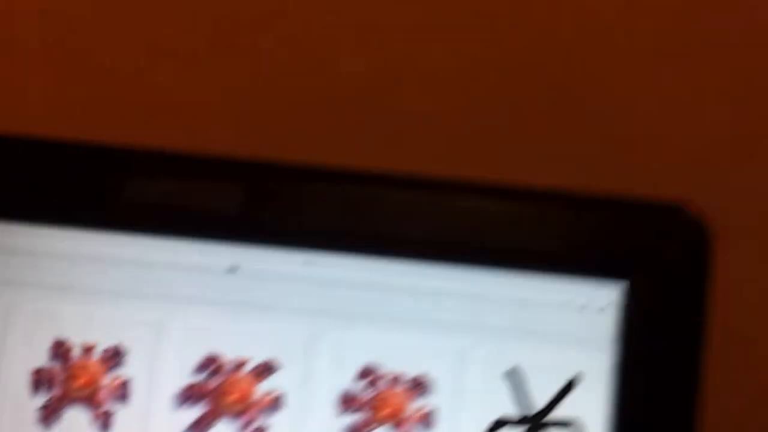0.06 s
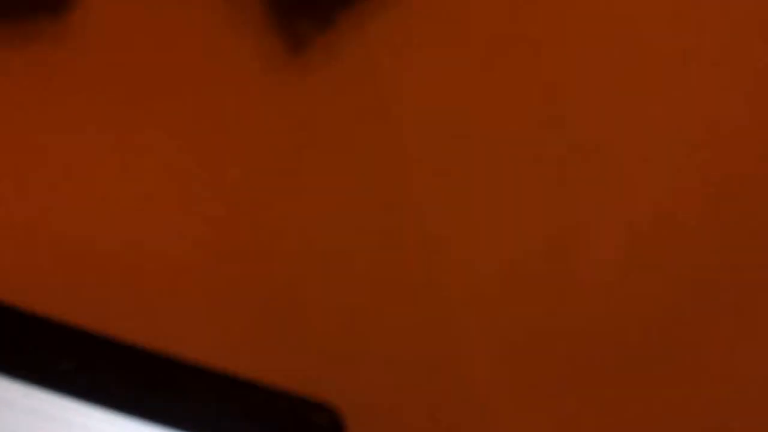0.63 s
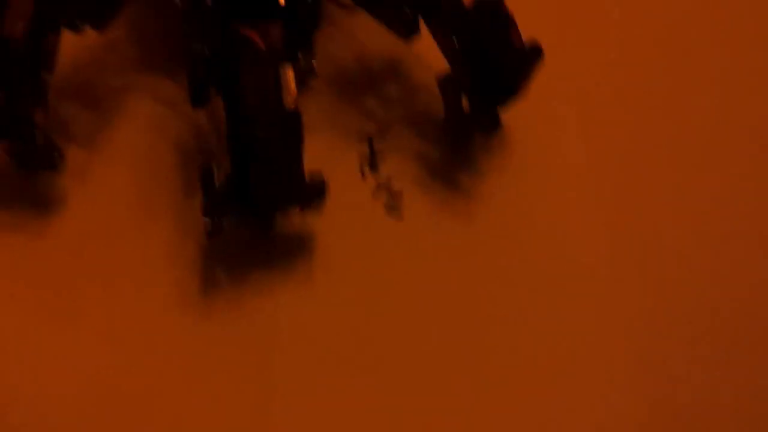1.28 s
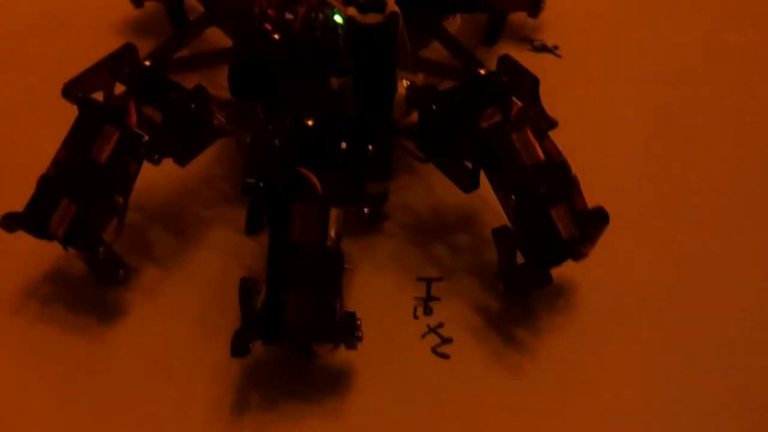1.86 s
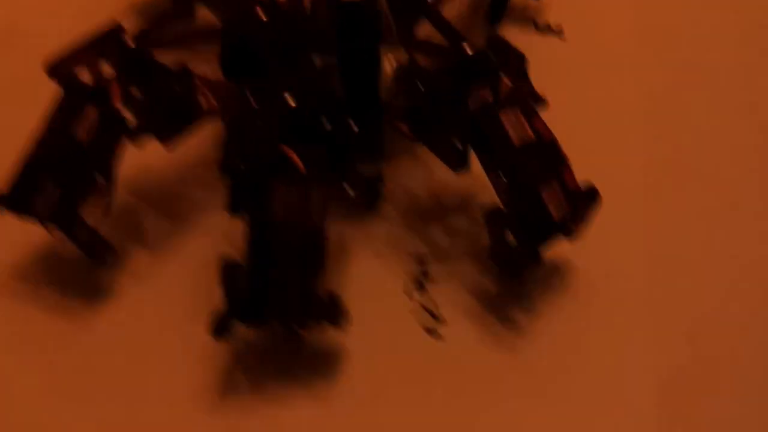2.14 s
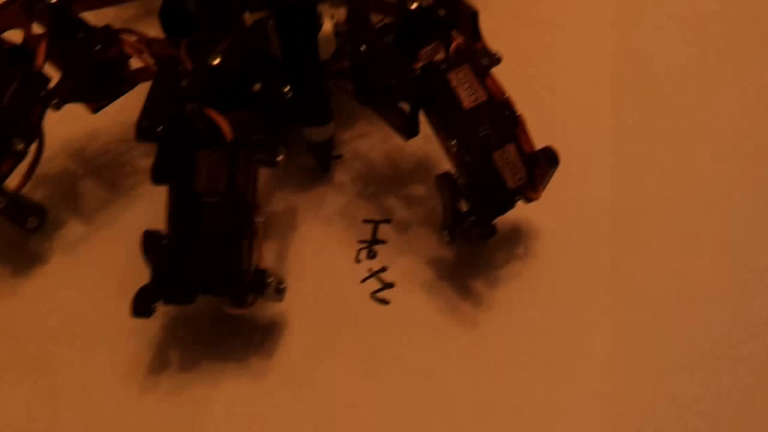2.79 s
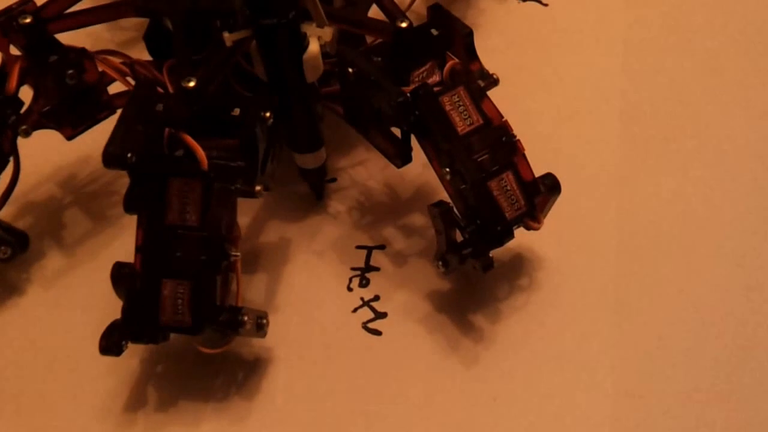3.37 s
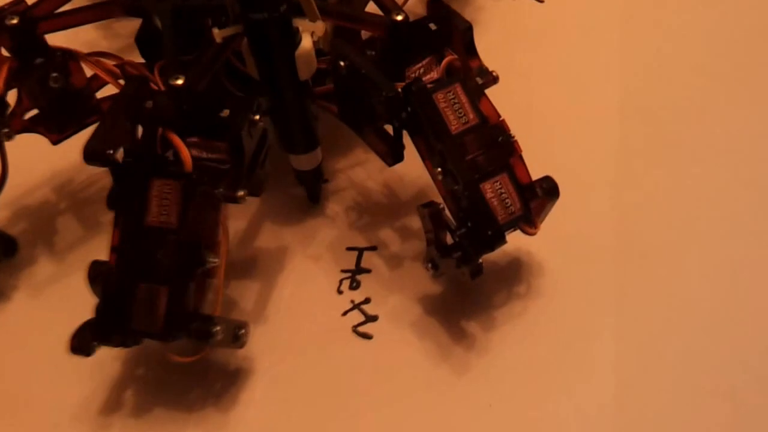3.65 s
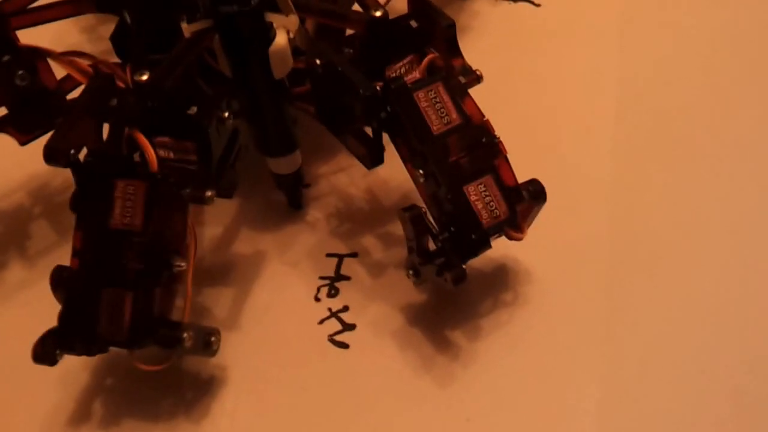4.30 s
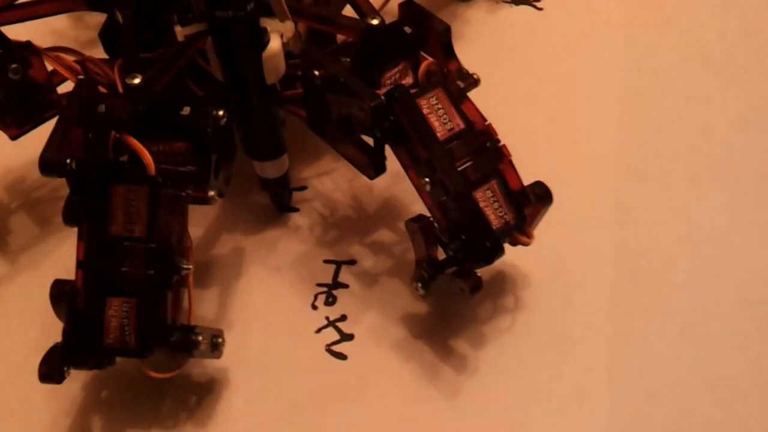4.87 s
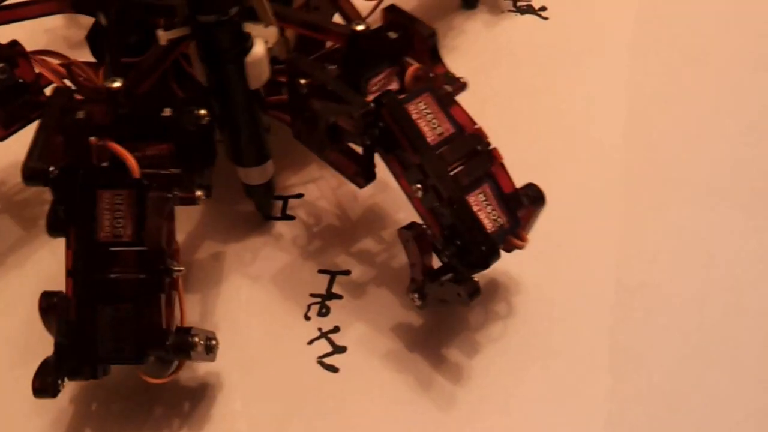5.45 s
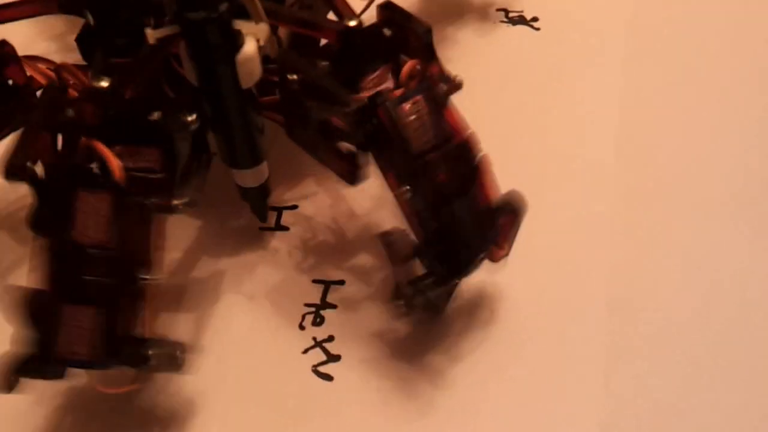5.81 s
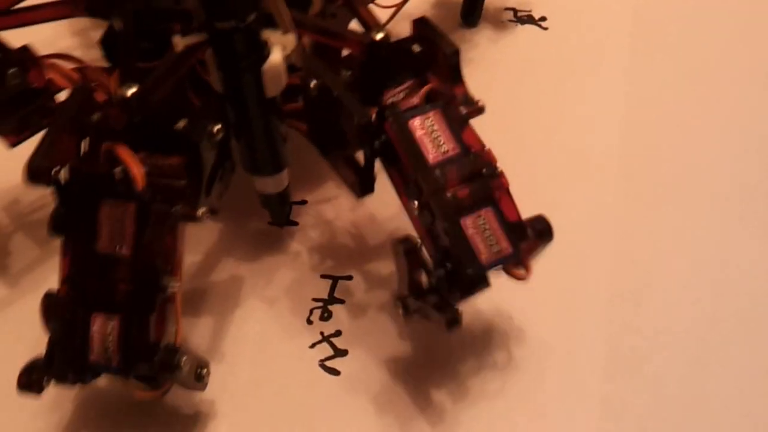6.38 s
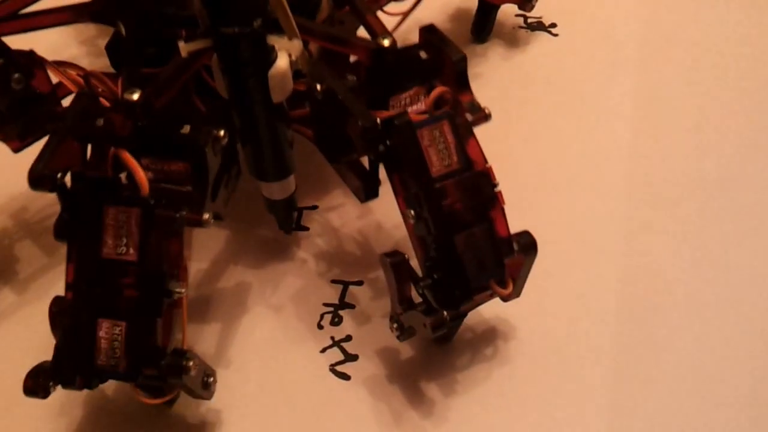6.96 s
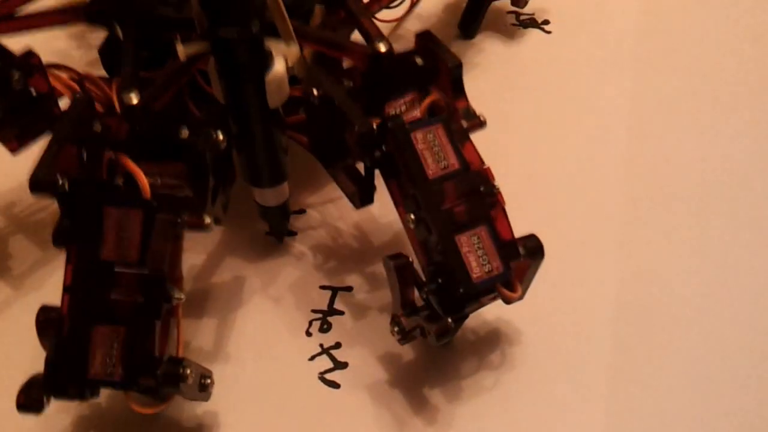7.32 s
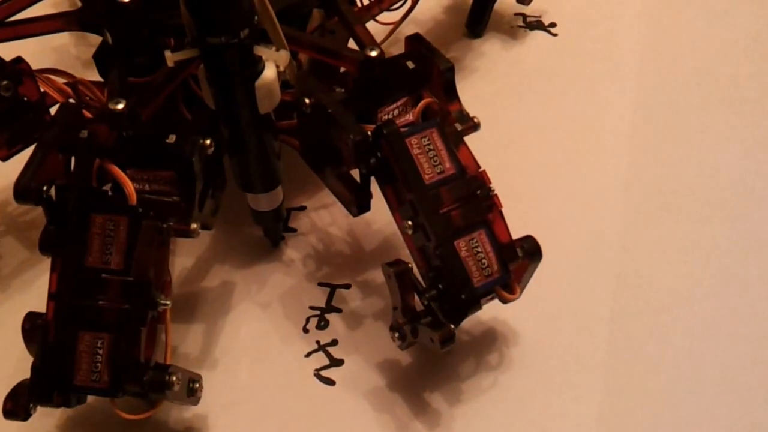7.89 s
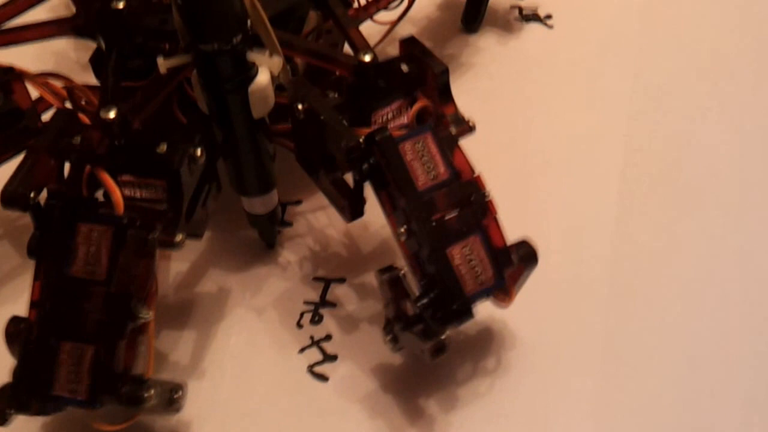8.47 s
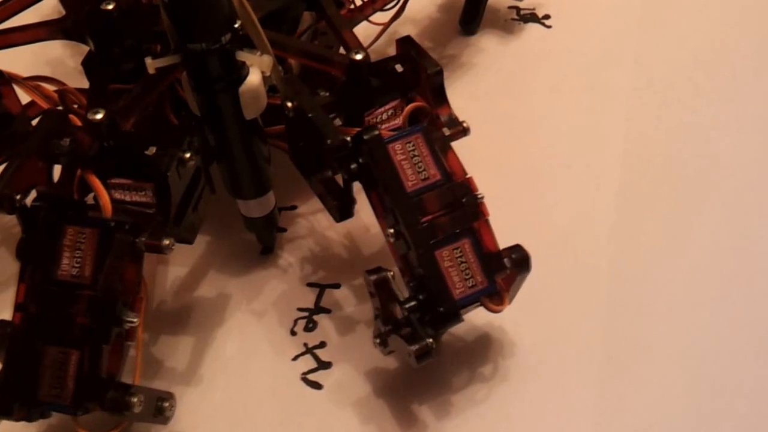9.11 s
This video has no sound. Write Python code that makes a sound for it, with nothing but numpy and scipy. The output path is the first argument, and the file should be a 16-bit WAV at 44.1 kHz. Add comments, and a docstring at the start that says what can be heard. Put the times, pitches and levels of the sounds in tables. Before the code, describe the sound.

Small servo motors in a legged robot chatter with a fine, steady buzz and scattered ticks, at first beside the fading hiss of a laptop fan. Later comes a run of short, bright whirs, mixed with knocks of feet and a pen on a tabletop, before the motors settle back to buzzing. A hand-held microphone picks it up nearby, over faint room hiss.

```python
"""A laptop fan hisses, then fades as a hand-held camera swings to a six-legged robot drawing with a pen.
Its servos chatter at the 50 Hz control rate while they hold the pose, then whir through six short moves:
the impacts of gear teeth excite the gearbox resonances. Motor brushes spit; a few sharp clicks stand out.
Legs and pen knock on the table, which rings in damped modes; the small room hisses faintly."""
import sys
import numpy as np
from scipy import signal
from scipy.fft import rfft, irfft, next_fast_len
from scipy.io import wavfile
from scipy.ndimage import uniform_filter1d, map_coordinates

SR = 44100
rng = np.random.default_rng(int(sys.argv[2]) if len(sys.argv) > 2 else 0)


def put_to_file(sound):
    """Save the sound as 16-bit audio at rate SR, in the file named by the first command-line argument."""
    columns = np.atleast_2d(sound).T  # one column per channel
    safe = np.clip(columns, -1, 1)
    whole_steps = np.round(safe * 32767)
    wavfile.write(sys.argv[1], SR, whole_steps.astype(np.int16))


N = 403074
FRAME_HZ, SPIN_UP_S = 50, 0.018  # control rate; time a motor takes to reach speed

# chatter of the servos holding the pose [t/s, level/dB, brightness/dB]
HOLD = [(0, -52.5, -15), (1.1, -51.5, -11.5), (1.5, -50.5, -12), (2.5, -49.5, -14), (2.85, -52, -12.5),
        (3.3, -48, -13), (5.4, -48, -10.5), (7.6, -51.5, -16), (8.35, -47.5, -10.5), (8.65, -50, -15),
        (9.14, -50.5, -14)]
# each servo's turn within the control frame [t/s, level/dB]
SERVO_SLOTS = [(.0095, 1), (.0135, -4.5), (0.014, -1), (0.018, 3.5)]
# spectrum of a running gearbox [f/Hz, level/dB]
GEAR_SPECTRUM = [(600, -45), (1600, -36), (2300, -31), (3100, -27), (4300, -16.5), (5300, -5), (6050, 1),
                 (6700, -2.5), (7600, -4.5), (9400, -9), (12700, -10.5), (15400, -16.5)]
# main impacts on the table [t/s, peak level/dB, hardness/dB]
KNOCKS = [(.123, -30.5, -12.5), (.755, -44, -11), (2.065, -33, -28), (4.233, -32.5, -19), (5.625, -32, -12),
          (5.652, -19, -18.5), (5.732, -33, -15), (6.045, -36, -8), (6.081, -34.5, -2), (6.108, -32, -15),
          (6.555, -22.5, -10), (6.601, -26.5, -6.5), (6.651, -35.5, -33), (6.854, -30.5, -9),
          (6.907, -34, -6), (6.922, -28, -29), (7.003, -32.5, -11), (7.072, -32, -16), (7.281, -21, -11.5),
          (7.295, -18.5, -14), (7.359, -23.5, -23), (7.39, -27, -11), (7.41, -27.5, -18),
          (8.893, -35.5, -14), (8.914, -33, -17.5), (9.044, -32, -30)]


def amp(db):
    """Amplitude ratio of a level in decibels."""
    return 10 ** (np.asarray(db) / 20)


def unit(x):
    """Normalisation to rms 1."""
    return x / np.sqrt(np.mean(x ** 2) + 1e-20)


def along(points, hz):
    """Interpolation of [f/Hz, value] points on a logarithmic frequency axis."""
    f, values = np.transpose(points)
    return np.interp(np.log(hz + 1), np.log(f), values)


def curves(rows):
    """Linear interpolation, sample by sample, of each column after t/s."""
    times, *columns = np.transpose(rows)
    return [np.interp(np.arange(N) / SR, times, column) for column in columns]


def wobble(rate):
    """Smooth random modulation: a spline through `rate` knots a second."""
    knots = rng.standard_normal(int(N * rate / SR) + 4)
    return map_coordinates(knots, [np.arange(N) * rate / SR])


def swell(s, rise_s, decay_s):
    """Linear rise to 1 at time s, then exponential decay."""
    t = np.arange(N) / SR - s
    return np.clip(1 + t / rise_s, 0, 1) * np.exp(-np.maximum(t, 0) / decay_s)


def filtered(x, response):
    """Linear filtering: the spectrum is multiplied by a frequency response."""
    size = next_fast_len(len(x) + 8192)
    return irfft(rfft(x, size) * response(np.fft.rfftfreq(size, 1 / SR)), size)[:len(x)]


def coloured(x, spectrum):
    """Spectral shaping by [f/Hz, level/dB] points, at rms 1."""
    return unit(filtered(x, lambda hz: amp(along(spectrum, hz))))


def add(track, s, sound):
    """Superposition of a sound on the track from time s."""
    part = track[max(round(s * SR), 0):][:len(sound)]
    part += sound[:len(part)]


def random_frames(per_second):
    """A Bernoulli process picks control frames: [t/s, size in standard deviations]."""
    frames = np.arange(N * FRAME_HZ // SR) / FRAME_HZ
    size = np.clip(rng.standard_normal(len(frames)), -2, 2)
    picked = rng.random(len(frames)) < per_second / FRAME_HZ
    return np.column_stack([frames, size])[picked]


def background(hiss_db=-60, resting_hand_db=-79):
    """Ambient room noise, and structure-borne rumble from the hand on the camera."""
    # room noise [f/Hz, level/dB]
    hiss_spectrum = [(20, -32.5), (45, -17), (100, -6), (200, -12), (500, -11.5), (1000, -15.5),
                     (2000, -17.5), (5000, -11.5), (10000, -26.5), (16000, -21)]
    # the hand shifts its grip [level/dB, rise/s, decay/s]
    grip = (-55.5, 0.12, 0.09)
    grip_db, rise_s, decay_s = grip
    hand_spectrum = [(10, -11), (25, 13), (45, -13), (80, 0), (160, -35), (600, -100)]  # [f/Hz, level/dB]
    rumble = coloured(rng.standard_normal(N), hand_spectrum)
    hiss = coloured(rng.standard_normal(N), hiss_spectrum)
    hand_gain = amp(resting_hand_db) + amp(grip_db) * swell(6.77, rise_s, decay_s)
    return amp(hiss_db) * hiss + hand_gain * rumble


def room(x):
    """Reverberation of a small furnished room: absorption ends the high treble first."""
    # reverberation time [f/Hz, T60/s]
    decay_times = [(200, 0.084), (2000, 0.33), (12000, 0.035)]
    hz, t, noise = signal.stft(rng.standard_normal(SR // 2), SR, nperseg=256)
    tail = signal.istft(noise * amp(-60 * t / along(decay_times, hz)[:, None]), SR, nperseg=256)[1]
    delayed = np.pad(x, (SR // 200, 0))
    return signal.fftconvolve(delayed, tail / np.linalg.norm(tail))[:N]


def fan(vent_width_hz=140):
    """Broadband flow noise of the laptop fan, with a narrow air resonance in its vent."""
    # the rush of air falls behind [t/s, level/dB]
    rush_fade = [(0, -49.5), (.45, -53.5), (.8, -58), (1.2, -60.5), (1.7, -77)]
    # flow noise [f/Hz, level/dB]
    rush_spectrum = [(260, -16), (450, -0.5), (800, -20), (1200, -8), (1600, -13), (2000, -8.5), (3000, -7),
                     (4200, 4.5), (5500, 1.5), (8000, -20), (15000, -25)]
    # vent resonance [t/s, f/Hz, level/dB]
    vent_resonance = [(0, 2680, -60), (.25, 2610, -59), (.55, 2540, -65), (.8, 2540, -86), (1.2, 2580, -97)]
    hz, db = curves(vent_resonance)
    lowpass = lambda f: 1 / (1 + (f / vent_width_hz) ** 2)
    waver = [filtered(rng.standard_normal(N), lowpass) for _ in range(2)]
    phase = 2 * np.pi * np.cumsum(hz) / SR
    vent = amp(db) * unit(waver[0] * np.cos(phase) + waver[1] * np.sin(phase))
    return vent + amp(curves(rush_fade)[0]) * coloured(rng.standard_normal(N), rush_spectrum)


def tremor(hold_db=-18, move_db=-30, shake_db=-26, shake_s=0.064):
    """Forced vibration: the legs patter as the servos work, and shake on after each knock."""
    # response of the robot's frame on the table [f/Hz, level/dB]
    frame_spectrum = [(76, -61), (130, -14.5), (172, -11.5), (193, -5.5), (259, 0.5), (339, -1.5),
                      (479, -13.5), (700, -17.5), (910, -23), (1540, -120)]
    hold_power = amp(curves(HOLD)[0] + hold_db) ** 2
    move_power = (amp(move_db) * effort()[0]) ** 2
    shake_power = sum((amp(db + shake_db) * swell(s + SPIN_UP_S, SPIN_UP_S, shake_s)) ** 2
                      for s, db, _ in KNOCKS)
    gain = np.sqrt(hold_power + move_power + shake_power) * amp(1.6 * wobble(9))
    return gain * coloured(impacts(rate=110, scatter_db=2.5, rub=0.72), frame_spectrum)


def knocks(hard_db=12, low_hz=155, contact_s=0.0019):
    """Modal ringing of the table under feet and pen: harder contacts excite more of the upper modes."""
    # modes of the table [f/Hz, level/dB, T60/s]
    modes = [(178, -8, 0.018), (272.4, 1, 0.036), (315, -3, 0.052), (516, -7, 0.046), (605, -29, 0.026),
             (827, -6, 0.024), (1285, -6, 0.012), (2236, -12.5, 0.018)]
    out, t = np.zeros(N), np.arange(SR // 6) / SR
    hz, db, t60 = np.transpose(modes)[:, :, None]
    upper_share = np.clip(np.log2(hz / 400), 0, 1)
    radiation = signal.butter(3, low_hz, "high", fs=SR, output="sos")  # a board radiates little bass
    foot_taps = [(s, -50.5 + 3 * size, -24) for s, size in random_frames(per_second=5)]  # as in KNOCKS
    for s, peak_db, hardness_db in [*KNOCKS, *foot_taps]:
        spot, detune = rng.standard_normal((2, len(modes), 1))  # each spot favours other modes
        mode_hz = hz * (1 + .025 * detune)
        gain = amp(db + 2 * spot + (hardness_db + hard_db) * upper_share)
        ring = np.sum(gain * amp(-60 * t / t60) * np.cos(2 * np.pi * mode_hz * t), axis=0)
        ring = signal.sosfilt(radiation, ring * (1 - np.exp(-t / contact_s)))
        add(out, s, amp(peak_db) * ring / np.abs(ring).max())
    return out


def clicks(noise_share=0.98):
    """Impulse excitation: a pulse and a brief noise, through a treble band and two lower resonances."""
    # sharp clicks; the one at 2.19 s is a very short, bright broadband tick
    # [t/s, peak level/dB, f/Hz, width/octaves, body level/dB, T60/s]
    sharp_clicks = [(0.758, -24.5, 4100, 0.74, -16, .025), (1.545, -29, 3500, 2.9, -8, 0.0023),
                    (2.1875, -18, 8000, .87, -28, 0.0027), (3.77, -25.5, 8450, 0.56, -30, .012),
                    (4.4002, -15, 5860, 0.36, -9, 0.015), (5.424, -15, 5650, 0.15, -11.5, 0.013),
                    (8.219, -29, 4500, .65, -7, .014), (8.26, -22, 5930, 0.51, -7, .015)]
    # resonances that give a click its body [f/Hz, bandwidth/Hz, level/dB]
    body_modes = [(1470, 800, -5.5), (2440, 720, -5)]
    out, t = np.zeros(N), np.arange(SR // 20) / SR
    body = lambda f: sum(amp(db) * 1j * f * width / (hz * hz - f * f + 1j * f * width)
                         for hz, width, db in body_modes)
    for s, peak_db, centre_hz, octaves, body_db, t60 in sharp_clicks:
        noise = rng.standard_normal(len(t)) * amp(-60 * t / t60)
        crack = noise_share * noise / np.linalg.norm(noise) + (t == 0)
        band = lambda f: np.exp(-.5 * (np.log2((f + 1) / centre_hz) / octaves) ** 2)
        click = filtered(np.pad(crack, (SR // 100, 0)), lambda f: band(f) + amp(body_db) * body(f))
        add(out, s - 1 / 100, amp(peak_db) * click / np.abs(click).max())  # early by the padding
    return out


def spits(per_second=16, scatter_db=4, rise_s=0.0007, boost_db=11):
    """Brush noise: the motor brushes spit tiny, very bright bursts, each shorter than a control frame."""
    # the sharpest bursts [t/s, level/dB]
    sharp = [(1.578, -47), (1.991, -43), (2.012, -38), (2.672, -39), (3.003, -40), (3.052, -44),
             (3.886, -44), (4.431, -42), (7.892, -39), (8.115, -43)]
    # brush noise [f/Hz, level/dB]
    brush_spectrum = [(3000, -24), (6000, -6), (8200, 0), (10000, -16), (12300, 5), (15400, -7.5)]
    times, hold_db, bright_db = np.transpose(HOLD)
    faint = [(s + SERVO_SLOTS[1][0], np.interp(s, times, hold_db + bright_db) + boost_db + scatter_db * z)
             for s, z in random_frames(per_second)]
    gate, t = np.zeros(N), np.arange(SR // 60) / SR
    for s, db in [*sharp, *faint]:
        add(gate, s, amp(db) * t / rise_s * np.exp(1 - t / rise_s))
    return gate * coloured(rng.standard_normal(N), brush_spectrum)


def impacts(rate, scatter_db, rub):
    """Shot noise: teeth or feet strike at random, `rate` times a second, over a share of sliding noise."""
    struck = rng.random(N) < rate / SR
    strength = amp(scatter_db * np.clip(rng.standard_normal(N), -2, 2))
    strikes = struck * strength * rng.choice([-1, 1], N)
    return unit(unit(strikes) + rub * rng.standard_normal(N))


def casing(x, t60, ring_db):
    """The dense modes of a servo case add a brief ring: convolution with decaying noise."""
    t = np.arange(SR // 20) / SR
    ring = rng.standard_normal(len(t)) * amp(-60 * t / t60)
    return unit(x + amp(ring_db) * signal.fftconvolve(x, ring / np.linalg.norm(ring))[:N])


def shifting_resonances(x, depth_db=2.5):
    """Time-varying filtering: resonances well up and fade as gear teeth and leg angles change."""
    spectra = signal.stft(x, nperseg=512)[2]
    patches = uniform_filter1d(rng.standard_normal(spectra.shape), size=5, axis=0)
    patches = uniform_filter1d(patches, size=5, axis=1)
    return signal.istft(spectra * amp(depth_db * unit(patches)), nperseg=512)[1][:N]


def gearbox(x, spectrum, crossover_hz=9000):
    """The gearbox resonance near 6 kHz and the sizzle above the crossover, each at rms 1."""
    shaped = coloured(x, spectrum)
    body = filtered(shaped, lambda hz: 1 / (1 + (hz / crossover_hz) ** 20))
    return unit(body), unit(shaped - body)


def holding(burst_s=0.0027, scatter_db=3.0, jitter_s=0.0015, idle=0.41, body_db=2, sizzle_db=1):
    """Pulse modulation: once per control frame a kick of current rattles the gears of each servo."""
    t = np.arange(N) / SR
    rattle, drive = np.zeros((2, N))
    for slot_s, db in SERVO_SLOTS:
        frame = np.round((t - slot_s) * FRAME_HZ).astype(int)
        size, late = np.clip(rng.standard_normal((2, N // SR * FRAME_HZ + FRAME_HZ)), -2, 2)[:, frame]
        from_kick_s = t - slot_s - frame / FRAME_HZ - jitter_s * late
        kick = amp(db + scatter_db * size) * np.exp(-.5 * (from_kick_s / burst_s) ** 2)
        rattle += amp(db) * (kick + idle) * impacts(rate=6000, scatter_db=4.5, rub=0.55)
        drive += kick
    # gearbox under a static load [f/Hz, level/dB]
    hold_spectrum = [(600, -44), (1200, -24), (1800, -28), (2900, -13), (3500, -13.5), (4600, -5),
                     (6200, 1.5), (7100, -3), (9400, -15), (12200, -20), (15400, -26)]
    body, sizzle = gearbox(shifting_resonances(rattle), hold_spectrum)
    sizzle = unit(sizzle * (drive + idle) ** 0.13)  # harder kicks are brighter
    level_db, bright_db = curves(HOLD)
    return amp(level_db) * (amp(body_db) * body + amp(bright_db + sizzle_db) * sizzle)


def twitches(gain_db=-10.5, rise_s=0.0022, case_hz=6210, ring_width_hz=400, ring_db=-2, sizzle_db=-2):
    """Transient excitation: a longer kick of current briefly spins one gear train and rings its case."""
    # the strongest kicks [t/s, relative level/dB, brightness/dB]
    kicks = [(.6545, -30, -27), (1.0745, -32, -20), (1.091, -30, -9), (1.6116, -30, 1.5),
             (2.5712, -30, -14), (2.61, -31.5, 2), (3.23, -28, -4), (3.2695, -26, -11), (3.431, -31.5, 0),
             (3.485, -29.5, -7), (3.511, -27, -25), (3.577, -31, -20), (3.711, -27, -25), (4.037, -31, 2),
             (4.051, -26.5, 0), (4.203, -24, -13), (4.654, -25, -3), (5.4553, -28, -14), (6.0815, -15, -17),
             (6.343, -18, -16), (6.9115, -15.5, -13), (6.942, -21.5, 11), (7.2995, -9.5, -18),
             (7.812, -28.5, -25), (7.878, -28.5, -6), (8.097, -29.5, -8), (8.17, -35, -18),
             (8.23, -27.5, -25), (8.278, -21.5, -8), (8.4553, -28, -24)]
    body, sizzle = gearbox(impacts(rate=5000, scatter_db=2.5, rub=0.76), GEAR_SPECTRUM)
    t = np.arange(SR // 25) / SR
    body_gain, sizzle_gain, ring = np.zeros((3, N))
    for s, db, bright_db in kicks:
        kick = amp(db + gain_db) * t / rise_s * np.exp(1 - t / rise_s)
        hz = case_hz * (1 + 0.0516 * rng.standard_normal())
        phase_drift = np.cumsum(rng.standard_normal(len(t))) * np.sqrt(2 * np.pi * ring_width_hz / SR)
        add(body_gain, s, kick)
        add(sizzle_gain, s, kick * amp(bright_db + sizzle_db))
        add(ring, s, kick * np.sin(2 * np.pi * hz * t + phase_drift))
    return body_gain * body + sizzle_gain * sizzle + amp(ring_db) * ring


def effort(brake_s=0.016, settle_s=0.16, dull_db=-4.5, brightening=0.28):
    """Gains of gear body and sizzle, summed in power: each move spins up, pushes, brakes and settles."""
    # leg moves [t/s, delay of hardest push/s, length/s, level at that push/dB, swell towards it/dB,
    # brightness/dB, settling level/dB]
    moves = [(5.529, 0.36, 0.39, -24, 5, -9.5, -43), (5.927, 0.12, 0.18, -25.5, 3.5, -5.5, -38),
             (6.252, 0.088, 0.16, -22, 8, -5.5, -35), (6.472, 0.079, 0.26, -23, 4.5, -5.5, -42),
             (6.751, 0.12, 0.25, -27, 1.5, -7.5, -35), (7.17, 0.14, 0.24, -25.5, 5.5, -8.5, -45.5)]
    t = np.arange(N) / SR
    body_power, sizzle_power = np.zeros((2, N))
    for start, hardest, length, db, swell_db, bright_db, settle_db in moves:
        stop = start + length
        push_db = np.interp(t - start, [0, hardest, length], [-swell_db, 0, -swell_db])
        drive = np.clip((t - start) / SPIN_UP_S, 0, 1) * np.exp(-np.maximum(t - stop, 0) / brake_s)
        run = amp(db + push_db) * drive
        settle = amp(settle_db) * swell(stop, SPIN_UP_S, settle_s)  # hunting around the new angle
        body_power += run ** 2 + settle ** 2
        sizzle_power += (amp(bright_db + brightening * push_db) * run) ** 2
        sizzle_power += (amp(bright_db + dull_db) * settle) ** 2
    return np.sqrt(body_power), np.sqrt(sizzle_power)


def moving(flutter_db=1.5, surge_db=1.17):
    """Incoherent sources add: several gear trains whir at once, their load trading back and forth."""
    whir = np.zeros(N)
    for _ in SERVO_SLOTS:
        load = amp(1.3 * wobble(18))
        teeth = impacts(rate=1500, scatter_db=0.5, rub=0.41)
        whir += load * casing(teeth, t60=0.0096, ring_db=-3.5)
    whir = shifting_resonances(whir)
    running_rms = np.sqrt(np.abs(uniform_filter1d(whir ** 2, size=1500)))
    flutter = amp(flutter_db * wobble(200) + surge_db * wobble(FRAME_HZ))
    body, sizzle = gearbox(whir / running_rms * flutter, GEAR_SPECTRUM)
    body_gain, sizzle_gain = effort()
    return body_gain * body + sizzle_gain * sizzle


def scene():
    """Superposition of all direct sound and the reverberation of servos, clicks and knocks."""
    clatter = holding() + spits() + moving() + twitches() + clicks()
    backdrop = tremor() + fan() + background()
    bumps = knocks()
    reverberation = room(amp(-14.0) * clatter + amp(-10.5) * bumps)
    return (clatter + bumps + reverberation + backdrop)[None]


def record(dry):
    """Band limiting: an ideal low-pass passes nothing above 15580 Hz."""
    return filtered(dry[0], lambda hz: hz < 15580)[None]


dry = scene()
out = record(dry)
put_to_file(out)
```